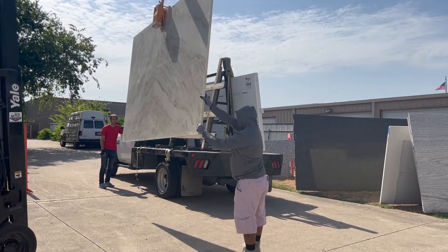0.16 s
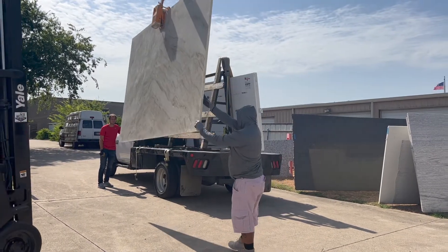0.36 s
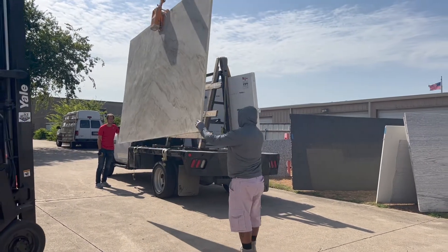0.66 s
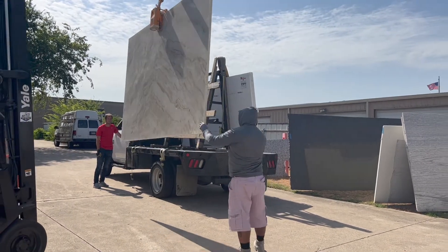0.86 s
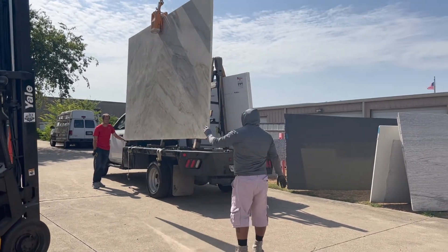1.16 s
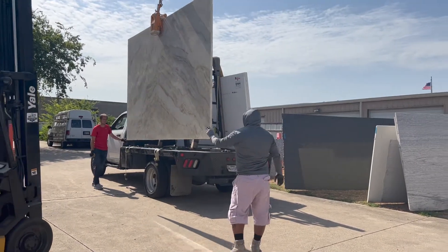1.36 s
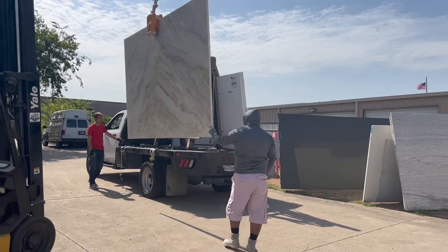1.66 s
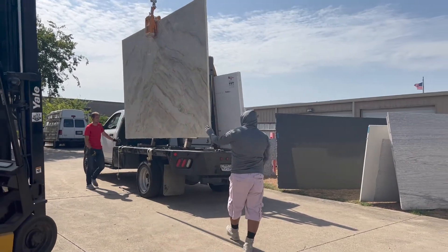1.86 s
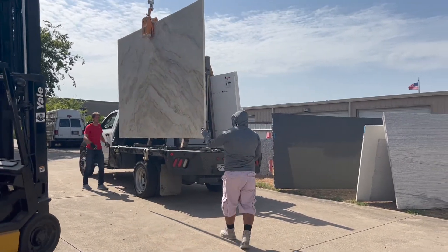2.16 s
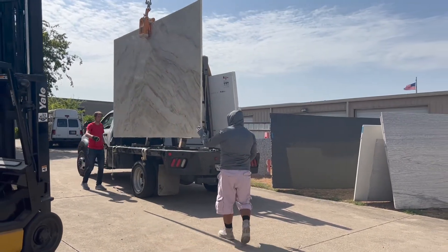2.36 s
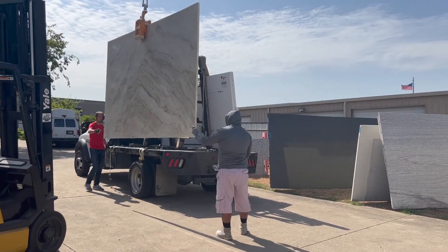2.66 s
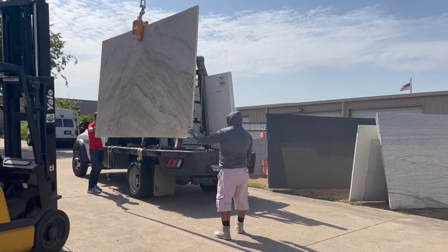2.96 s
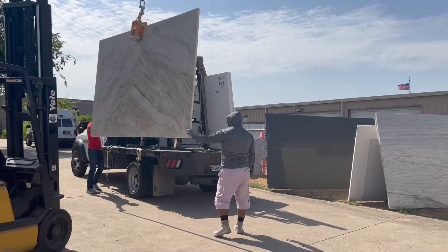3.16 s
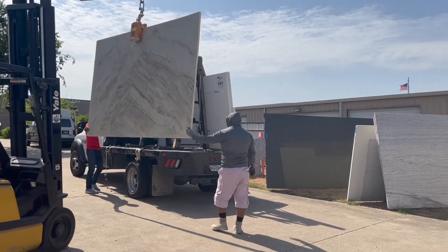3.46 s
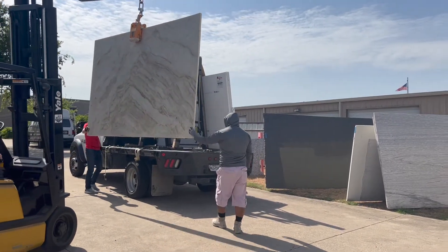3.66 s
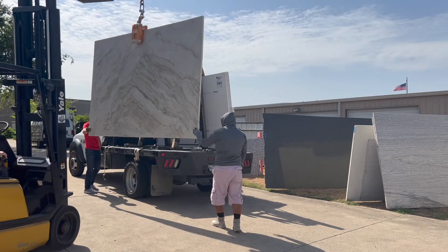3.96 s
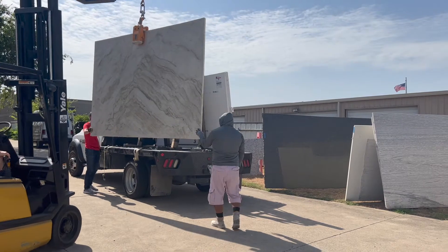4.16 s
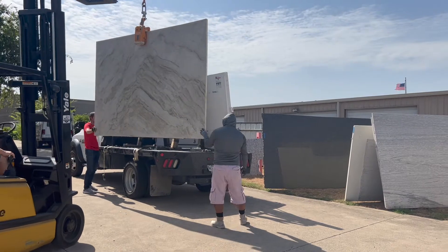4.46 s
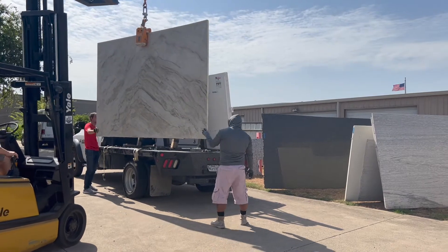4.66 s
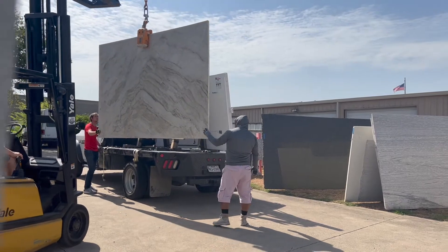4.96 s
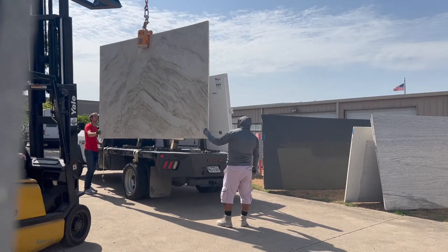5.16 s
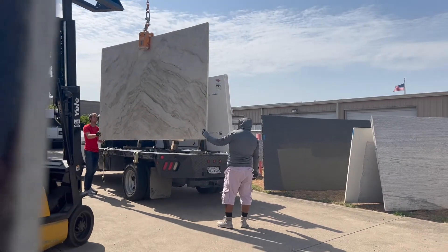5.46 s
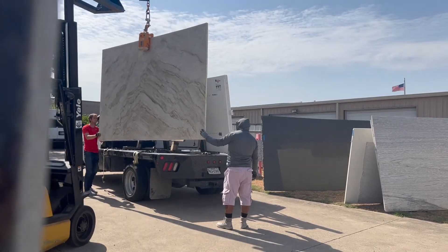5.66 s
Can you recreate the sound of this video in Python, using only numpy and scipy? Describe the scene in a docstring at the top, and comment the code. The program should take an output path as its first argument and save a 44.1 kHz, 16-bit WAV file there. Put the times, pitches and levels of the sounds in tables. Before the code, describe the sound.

A forklift engine revs once and settles to a low throbbing idle, with hydraulic hiss, dull metal clanks and tiny rhythmic belt chirps outdoors.

```python
"""An open yard, a propane forklift close by, a little to the left of a two-port microphone, a stone slab hanging from it.
It revs once, idles, then picks up a little: sines on the shaft orders, with noise pulsed by the firings.
Its belt chirps once a turn (short rasp and squeal); the hydraulics, strongest at first, hiss and whistle.
Mast and chain clank as the load shifts: struck modes, a dull thud and rattling noise. Brief tones come later.
A second deep hum, probably the waiting truck, swells and beats against the engine."""
import sys
import numpy as np
from scipy.fft import rfft, irfft, next_fast_len
from scipy.io import wavfile
from scipy.ndimage import uniform_filter1d, map_coordinates

SR = 44100
rng = np.random.default_rng(int(sys.argv[2]) if len(sys.argv) > 2 else 0)


def inscribe(sig):
    """Save sig as 16-bit PCM at rate SR to the path in sys.argv[1].

    A 1-D sig is mono; a 2-D sig holds one channel per row.
    Samples are clipped to [-1, 1] before scaling.
    """
    pcm = np.round(np.clip(np.atleast_2d(sig).T, -1, 1) * 32767)
    wavfile.write(sys.argv[1], SR, pcm.astype(np.int16))


N = 256220


def amp(db):
    """Decibels to gain."""
    return 10 ** (np.asarray(db) / 20)


def along(points, hz):
    """Read (Hz, value) points on a log frequency axis."""
    f, v = np.transpose(points)
    return np.interp(np.log(hz + 1), np.log(f + 1), v)


def curves(rows):
    """One value per sample for each column after the time."""
    s, *cols = np.transpose(rows)
    return [np.interp(np.arange(N) / SR, s, c) for c in cols]


def wobble(rate):
    """A smooth random curve, rate knots a second."""
    knots = rng.standard_normal(int(N * rate / SR) + 4)
    return map_coordinates(knots, [np.arange(N) * rate / SR])


def filtered(x, response):
    """Multiply the spectrum of x by a response of frequency."""
    m = next_fast_len(N + 8192)
    return irfft(rfft(x, m) * response(np.fft.rfftfreq(m, 1 / SR)), m)[..., :N]


# Left-right likeness of noise at the two ports, used down to -0.6: [freq_hz, likeness]
PORT_LIKENESS = [(60, 0.91), (300, 0.91), (550, 0.06), (800, -0.65), (1200, 0.42), (1700, -0.22),
                 (2600, 0.33), (3300, -.05), (4200, .65), (5000, 0.62), (6000, .1), (7300, .7), (8300, 0.5),
                 (13000, 0.11)]
# Share of the left-right difference that is the middle turned a quarter cycle: [freq_hz, share]
PHASE_SHARE = [(3000, .2), (6500, .3), (8000, .9)]


def rush(spectrum, ripple_db=2.5, ripple_hz=22):
    """Coloured stereo noise, its middle at rms 1; echoes off slabs and panels ripple the midrange."""
    def ports(hz):
        depth_db = ripple_db * hz / (hz + 200) / (1 + (hz / 4500) ** 2)
        knots = rng.standard_normal(int(hz[-1] / ripple_hz) + 4)
        ripple = amp(depth_db * map_coordinates(knots, [hz / ripple_hz]))
        spread = np.arccos(np.clip(along(PORT_LIKENESS, hz), -.6, 1)) / 2
        return amp(along(spectrum, hz)) * ripple * [np.ones_like(hz), np.tan(spread)]

    def share(hz):
        return np.clip(along(PHASE_SHARE, hz), 0, 1)

    middle, other = rng.standard_normal((2, N))
    turned = filtered(middle, lambda hz: -1j * share(hz))
    independent = filtered(other, lambda hz: np.sqrt(1 - share(hz) ** 2))
    mid, side = filtered(np.array([middle, turned + independent]), ports)
    return np.array([mid + side, mid - side]) / np.std(mid)


def tone(pitch, waver_hz, rate):
    """A sine of rms 1 whose pitch wavers at random, rate knots a second; faster and wider is rougher."""
    return np.sqrt(2) * np.sin(2 * np.pi * np.cumsum(pitch + waver_hz * wobble(rate)) / SR)


def add(track, s, sound):
    """Mix a sound into a track from time s on."""
    start = int(np.clip(round(s * SR), 0, N - 1))
    track[..., start:start + sound.shape[-1]] += sound[..., :N - start]


# Pulls of the lift lever; the hiss starts at its level and sags, the boost is for ordinary belt chirps:
# [start_s, end_s, pump_load (0-1), hiss_db, chirp_boost_db]
LEVER_PULLS = [(0, 0.481, 0.98, -38, 6.5), (5.174, 5.418, 0.2, -52, 4.5)]


def lifts(attack, release):
    """One row for each pull of the lever: it rises towards 1, holds and falls back (times in s)."""
    t = np.arange(N) / SR
    rows = []
    for start, end, *_ in LEVER_PULLS:
        rise = np.clip((t - start) / attack, 0, 1)
        fall = np.clip(1 - (t - end) / release, 0, 1)
        rows.append(rise * fall)
    return np.array(rows)


def throttle_opening(revs, pump, per_rev=0.086, per_gain=0.0078, for_pump=0.65, lag_s=0.058):
    """The throttle opens to hold revs above idle, to gain speed and to drive the pump."""
    gaining = uniform_filter1d(np.gradient(revs) * SR, int(lag_s * SR))
    return np.maximum(per_rev * revs + per_gain * gaining + for_pump * pump, 0)


# What exhaust and body pass of the higher shaft orders, before effort and order trims: [freq_hz, level_db]
EXHAUST_PASS = [(62, -28.5), (88, -27), (108, -35.5), (121, -34.5), (131, -29), (153, -47.5), (167, -38.5),
                (180, -52.5), (196, -38), (210, -41.5), (245, -53), (305, -51.5), (420, -58.5),
                (520, -63.5)]
# Trims of the shaft orders the unequal cylinders favour, third order up, last one repeated: [level_db]
ORDER_TRIM = [-1, 0, -1.5, -0.5, 0.5, -9, -0.5, -1.5, -3, 1, -0.5]


def engine(speed, turns, revs, throttle, idle_db=-31, rev_db=-35.0, throttle_db=-26,
           effort_share=0.4241, count=21):
    """Four cylinders fire twice a turn; higher shaft orders slide through the exhaust's resonances."""
    # revs and throttle both make the firing harder
    firing_db = 20 * np.log10(amp(idle_db) + amp(rev_db) * revs + amp(throttle_db) * throttle)
    note = amp(firing_db + 1.1 * wobble(13)) * np.sin(4 * np.pi * turns)
    effort_db = effort_share * (firing_db - idle_db)
    for k, order in enumerate(range(3, count)):
        uneven_db = order / 7 * wobble(5)
        trim_db = ORDER_TRIM[min(k, len(ORDER_TRIM) - 1)]
        level_db = along(EXHAUST_PASS, order * speed) + effort_db + uneven_db + trim_db
        note += amp(level_db) * np.sin(2 * np.pi * (order * turns + rng.random()))
    return np.sqrt(2) * note


# Spectrum of the exhaust's puffing, relative: [freq_hz, level_db_per_hz]
RUMBLE_SPECTRUM = [(15, -31), (33, -21), (48, 5), (65, 4), (110, 1.5), (200, -2), (260, -13.5), (400, -18),
                   (700, -34.5), (1500, -60)]
# Spectrum of the block and fan, relative: [freq_hz, level_db_per_hz]
BLOCK_SPECTRUM = [(100, -13), (350, 3.5), (550, 7.5), (750, 3), (950, 1.5), (1300, 0.34), (2000, -6),
                  (2800, -11), (4000, -13), (5200, -19.5), (6500, -25), (8200, -18), (12000, -29),
                  (15500, -25)]


def engine_noise(turns, throttle, rumble_db=-28.5, block_db=-41.0, block_rise_db=1.5,
                 puff=0.4, clatter=0.049):
    """The exhaust puffs at each firing, over the evener rush of block and fan, which grows with throttle."""
    firing = np.cos(4 * np.pi * turns)
    rumble = amp(rumble_db + 1.7 * wobble(22)) * (1 + puff * firing) * rush(RUMBLE_SPECTRUM)
    block_level = amp(block_db + block_rise_db * throttle + 0.77 * wobble(14))
    block = block_level * (1 + clatter * firing) * rush(BLOCK_SPECTRUM)
    return rumble + block * amp([[.8], [-.8]])  # dB left, right


# Spectrum of the intake's roar, relative: [freq_hz, level_db_per_hz]
INTAKE_SPECTRUM = [(200, -22.5), (310, 7.5), (400, 3.5), (520, -2.5), (720, -17.5), (990, -6), (1400, -26),
                   (6000, -50.5)]


def intake(turns, throttle, shut_db=-47, open_db=-37, gulp=0.49):
    """The open throttle roars, one gulp to each cylinder."""
    opening = amp(shut_db) + amp(open_db) * throttle
    return opening * (1 + gulp * np.sin(4 * np.pi * turns)) * rush(INTAKE_SPECTRUM)


# Course of the second hum: [start_s, pitch_hz, level_db]
HUM_COURSE = [(0, 80.3, -22), (1.2, 79.2, -27), (1.8, 79, -31.5), (3.0, 76.7, -25.5), (3.6, 75.8, -22),
              (4.5, 75.1, -15.5), (5.1, 74.9, -21), (5.81, 74.7, -21.5)]
# Its tones, relative to that course: [multiple of the pitch, level_db]
HUM_OVERTONES = [(1, 1), (2, -18.5), (3, -26), (4, -40)]


def hum():
    """A deep tone with weak overtones, its pitch gliding slowly as its level swells."""
    pitch_hz, level_db = curves(HUM_COURSE)
    cycles = np.cumsum(pitch_hz) / SR
    tones = np.zeros(N)
    for multiple, db in HUM_OVERTONES:
        tones += amp(db) * np.sin(2 * np.pi * (multiple * cycles + rng.random()))
    return np.sqrt(2) * amp(level_db) * tones


# Spectrum of the oil's hiss, relative: [freq_hz, level_db_per_hz]
OIL_SPECTRUM = [(300, -9), (550, 11), (800, -10), (1200, 4), (1400, -0.5), (1680, 2), (1900, 1),
                (2500, -15), (3800, -4.5), (5500, -13.5), (8300, -15), (15000, -23.5)]
# The hydraulic valve's whistle, before its roughness: [start_s, pitch_hz, level_db]
VALVE_WHISTLE = [(0, 2070, -44), (.16, 2135, -46), (.27, 2085, -44), (.39, 2050, -46), (.44, 2244, -47),
                 (.51, 2290, -51), (.57, 2205, -76.5), (5.15, 1982, -74.5), (5.3, 2000, -47),
                 (5.55, 1995, -60)]


def hydraulics(turns, sag_db_per_s=17, rough_db=3, pulse=0.29):
    """Oil hisses through the valve at each lift and eases off; its rough whistle pulses with each turn."""
    start, _, _, hiss_db, _ = np.transpose(LEVER_PULLS)[:, :, None]
    flow = lifts(attack=0.085, release=0.2)
    since = np.maximum(np.arange(N) / SR - start, 0)
    hiss_level = (flow * amp(hiss_db - sag_db_per_s * since)).sum(0)
    hiss = hiss_level * amp(2.1 * wobble(30)) * rush(OIL_SPECTRUM)
    pitch_hz, whistle_db = curves(VALVE_WHISTLE)
    strength = amp(whistle_db + rough_db * wobble(70)) * (1 + pulse * np.cos(2 * np.pi * turns))
    # the whistle wavers independently at each port
    whistle = strength * np.array([tone(pitch_hz, 90, rate=350) for port in range(2)])
    return (hiss + whistle) * amp([[.9], [-.9]])  # dB left, right


# The loudest belt chirps, before the common rasp_db: [start_s, level_db, squeal_over_rasp_db]
LOUD_CHIRPS = [(0.3, -29.5, -2.5), (0.343, -28, -6), (0.464, -31, -2.5), (1.165, -35.5, -2),
               (1.328, -39, 1), (2.425, -30.5, -6), (2.7934, -35, -7), (3.258, -36, -1), (3.352, -37, -3),
               (3.443, -35, -3), (3.537, -30, -5), (3.858, -37, -10), (3.902, -33, -4), (4.272, -35, -5),
               (4.4573, -32.5, -7), (4.547, -38.5, 0.5), (4.638, -35, -1), (5.044, -36.5, 2),
               (5.178, -30.5, 5.5), (5.265, -30, -0.5), (5.349, -29, -0.5), (5.434, -35.5, 0.5),
               (5.475, -35, 4), (5.602, -38.5, 3), (5.685, -35, -3)]
# Squeal over rasp in the other chirps: [start_s, level_db]
SQUEAL_OVER_RASP = [(0, 0.5), (1.5, -8), (4.3, -6), (5.2, 2), (5.8, -2)]
# Spectrum of the slip's rasp, relative: [freq_hz, level_db_per_hz]
RASP_SPECTRUM = [(1500, -25), (3200, 1), (4850, 3), (5500, -7), (6800, -4.5), (7700, 3), (8700, 1),
                 (9200, 1.5), (12300, -4.5), (13000, -6.5), (14400, -2), (16000, -15.5)]
# Centre pitch of the squeal with the pump at rest, and its rise at full load
SQUEAL_HZ, SQUEAL_RISE_HZ = 3997, 252.7


def belt_slips(turns, revs, pump, ordinary_db=-40, grip_db=0.5, alternate_db=0.6, scatter_db=2.3,
               early_s=0.0041):
    """The belt slips once a turn, sooner and harder with the pump, less with revs, every other one stronger."""
    strain_db = np.transpose(LEVER_PULLS)[-1] @ lifts(attack=.015, release=0.02)
    slip_db = ordinary_db + strain_db - grip_db * revs * (strain_db <= 0)  # revs count only unstrained
    squeal_db, = curves(SQUEAL_OVER_RASP)
    slips = list(LOUD_CHIRPS)
    # the worn spot comes round late in each turn
    passes = np.interp(np.arange(int(turns[-1])) + 5 / 6, turns, np.arange(N) / SR)
    for turn, (s, chance) in enumerate(zip(passes, rng.standard_normal(len(passes)))):
        # a loud chirp within 20 ms takes this one's place
        if min(abs(s - row[0]) for row in LOUD_CHIRPS) > 1 / 50:
            now = int(s * SR)
            level_db = slip_db[now] + alternate_db * (-1) ** turn + scatter_db * chance
            slips.append((s - early_s * pump[now], level_db, squeal_db[now]))
    return slips


def belt(turns, revs, pump, octave_db=-16, octave_rise_db=13, rasp_db=-12.0, attack=0.00038, life=0.018,
         octave_waver_hz=200):
    """Each slip on the pulley is a short noise rasp with a narrow squeal and its octave in it."""
    t = np.arange(SR // 12) / SR
    chirp = (1 - np.exp(-t / attack)) * np.exp(-(t / life) ** 2)
    slip, sing = np.zeros((2, N))
    for s, db, sing_db in belt_slips(turns, revs, pump):
        add(slip, s, amp(db) * chirp)
        add(sing, s, amp(db + sing_db) * chirp)
    pitch = SQUEAL_HZ + SQUEAL_RISE_HZ * pump + 40 * wobble(13)  # no two slips sing quite alike
    squeal = tone(pitch, 105, rate=730) * amp([[1.4], [-1.4]])  # dB left, right
    octave = amp(octave_db + octave_rise_db * pump) * tone(2 * pitch, octave_waver_hz, rate=550)
    return amp(rasp_db) * (sing * squeal + slip * (octave + rush(RASP_SPECTRUM)))


def ring(modes, contact_hz, focus_db, t, reach_hz=100, scatter_db=0.5):
    """Struck modes die away; the contact favours those near it, and the two ports get them out of step."""
    hz, db, t60 = np.transpose(modes)[:, :, None]
    db = db - focus_db * np.minimum(abs(hz - contact_hz) / reach_hz, 1)
    db = db + scatter_db * rng.standard_normal(hz.shape)
    phase = rng.uniform(-0.94, 1, (2, len(modes), 1))
    return (amp(db - 60 * t / t60) * np.sin(2 * np.pi * hz * t + phase)).sum(1)


# Knocks of the mast in its channels, before the common trims; contact_hz is what the contact excites most:
# [start_s, level_db, link_rattle_db, contact_hz]
MAST_KNOCKS = [(0.059, -18, -41, 560), (0.087, -37, -39.5, 556), (0.135, -29.5, -38.5, 1230),
               (0.214, -26, -38, 1500), (0.8, -27, -42.5, 593), (0.849, -27.5, -43, 580),
               (0.938, -20.5, -39.5, 640), (1.008, -22.5, -38, 686), (1.04, -27.5, -49, 664),
               (1.426, -17, -45.5, 640), (1.459, -20, -50, 660), (1.554, -18.5, -48.5, 570),
               (1.579, -23, -57, 615)]
# Clinks of the chain, on top of the mode levels: [start_s, level_db, contact_hz]
CHAIN_CLINKS = [(0.061, -40, 3470), (0.8, -42.5, 3500), (0.849, -45, 3500), (0.938, -49, 3460),
                (1.01, -46, 5840), (1.058, -44, 5840), (1.455, -39.5, 3500), (1.546, -40.5, 4840)]
# Steel modes of the mast, relative: [freq_hz, level_db, t60_s]
MAST_MODES = [(440, -2.5, 0.13), (563, 7.5, 0.068), (659, -3.5, 0.21), (972, -4.5, .08), (1222, -9, 0.12),
              (1490, -9, 0.08)]
# Steel modes of the chain, relative: [freq_hz, level_db, t60_s]
CHAIN_MODES = [(3510, 2, 0.14), (4300, -3.5, 0.12), (4840, -2, 0.087), (5820, -3, .08)]
# Spectrum of the mast's dull knock, relative: [freq_hz, level_db_per_hz]
THUD_SPECTRUM = [(200, -15), (500, 8), (900, -7), (2000, -13), (5000, -48)]
# Spectrum of the rattling chain links, relative: [freq_hz, level_db_per_hz]
RATTLE_SPECTRUM = [(2000, -7), (3500, 1), (4500, -2), (5300, -11), (6200, -7.5), (7500, -7.5), (15000, -16)]


def clanks(mast_db=-3.5, mast_focus_db=4, chain_focus_db=9, rattle_db=-1, rattle_t60=0.13,
           attack=0.0056, thud_db=-13, thud_t60=0.14):
    """The swaying load knocks the mast in its channels and clinks the chain: ringing modes and noise."""
    t = np.arange(SR // 3) / SR
    steel, thud, rattle = np.zeros((2, N)), np.zeros(N), np.zeros(N)
    onset = 1 - np.exp(-t / attack)
    for s, db, links_db, contact_hz in MAST_KNOCKS:
        add(steel, s, amp(db + mast_db) * onset * ring(MAST_MODES, contact_hz, mast_focus_db, t))
        add(thud, s, onset * amp(db + thud_db - 60 * t / thud_t60))
        add(rattle, s, amp(links_db + rattle_db - 60 * t / rattle_t60))
    for s, db, contact_hz in CHAIN_CLINKS:
        add(steel, s, amp(db) * ring(CHAIN_MODES, contact_hz, chain_focus_db, t))
    return steel + thud * rush(THUD_SPECTRUM) + rattle * rush(RATTLE_SPECTRUM)


# A low drone, the second hum's third harmonic standing out for a second; a dry chain wheel squeaking;
# a short groan: [start_s, end_s, pitch_hz, waver_hz, level_db]
DRONE_SQUEAK_GROAN = [(2.097, 3.15, 234.2, 0.9, -36.5), (2.66, 2.828, 3850, 50, -56),
                      (5.5, 5.7, 540, 18, -43)]


def brief_tones():
    """A drone, a squeak and a groan: wavering sines that each swell, hold and fade."""
    sound = np.zeros(N)
    for start, end, hz, waver_hz, db in DRONE_SQUEAK_GROAN:
        swell = np.interp(np.arange(N) / SR, np.linspace(start, end, 4), [0, 1, 1, 0])
        sound += swell * amp(db) * tone(hz, waver_hz, rate=78)
    return sound


# Crankshaft speed: [start_s, turns_per_s]
CRANK_SPEED = [(0, 20.93), (.13, 22.7), (.36, 23.34), (.65, 30.32), (.83, 30.14), (1.07, 26.99),
               (1.52, 22.32), (1.8, 21.27), (2.62, 21.92), (3.35, 21.3), (3.69, 21.85), (4.2, 21.66),
               (5.07, 22.22), (5.51, 24.45), (5.81, 22.94)]
IDLE_SPEED = 21.86  # turns a second


def scene():
    """The forklift's sounds follow its crankshaft, pump and load; engine and hum lean a little left."""
    speed, = curves(CRANK_SPEED)
    turns = np.cumsum(speed) / SR
    revs = np.maximum(speed - IDLE_SPEED, 0)
    pump = np.transpose(LEVER_PULLS)[2] @ lifts(attack=0.0138, release=0.14)
    throttle = throttle_opening(revs, pump)
    machines = engine(speed, turns, revs, throttle) + engine_noise(turns, throttle)
    machines = machines + intake(turns, throttle) + hum()
    machines = machines * amp([[.45], [-.45]])  # dB left, right
    return machines + hydraulics(turns) + belt(turns, revs, pump) + clanks() + brief_tones()


# Response of the ports' sum, which cancels where they are in opposite phase: [freq_hz, level_db]
SUM_RESPONSE = [(8700, -0.5), (9300, -19), (9900, -27), (10500, -32), (11100, -10), (11800, 2.5)]
# Response of the ports' difference, which cancels where they are in phase: [freq_hz, level_db]
DIFFERENCE_RESPONSE = [(8000, 0.5), (9000, 3.5), (11500, 0.5), (12400, 0), (13200, -22), (14200, -6.5),
                       (15500, 6.5)]
TOP_HZ = 15850  # band limit


def record(dry):
    """The microphone's two ports colour sum and difference, each in its own way; then the band limit."""
    def colour(hz):
        return amp([along(SUM_RESPONSE, hz), along(DIFFERENCE_RESPONSE, hz)]) * (hz < TOP_HZ)

    left, right = dry
    mid, side = filtered(np.array([left + right, left - right]) / 2, colour)
    return np.array([mid + side, mid - side])


dry = scene()
out = record(dry)
inscribe(out)
```